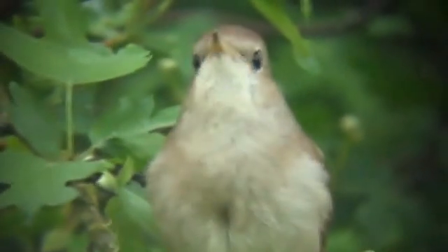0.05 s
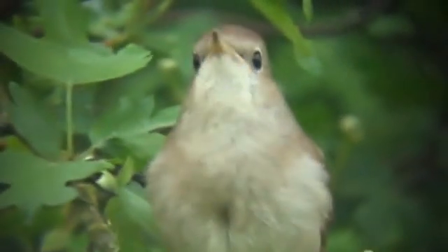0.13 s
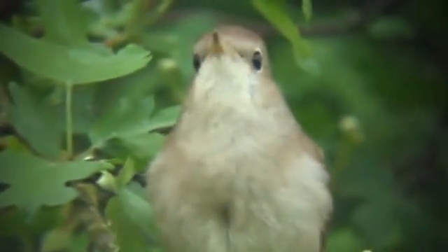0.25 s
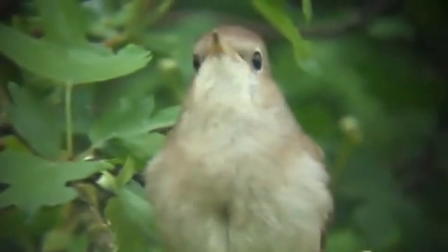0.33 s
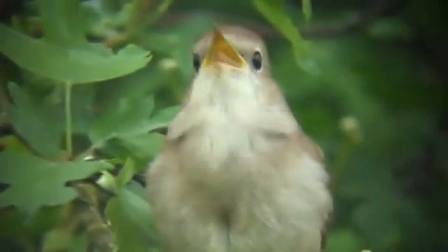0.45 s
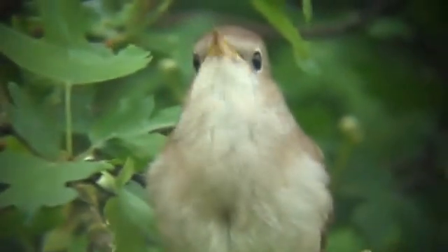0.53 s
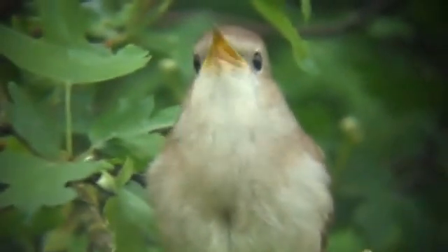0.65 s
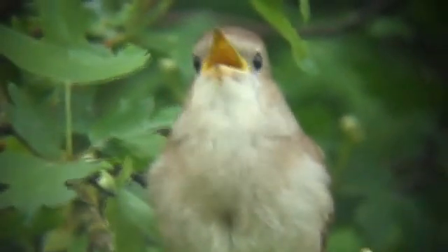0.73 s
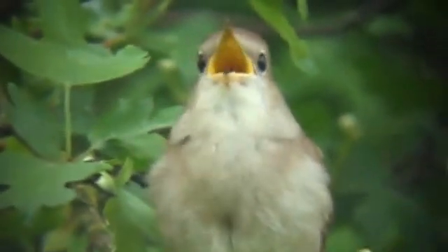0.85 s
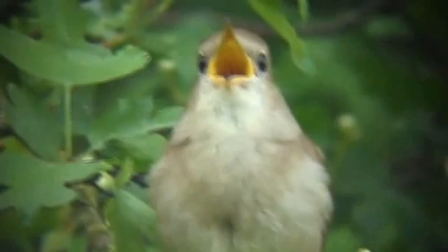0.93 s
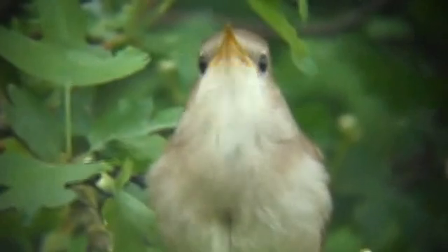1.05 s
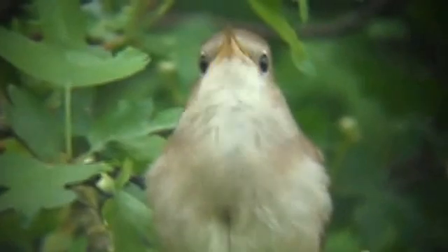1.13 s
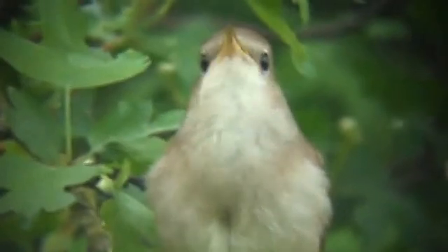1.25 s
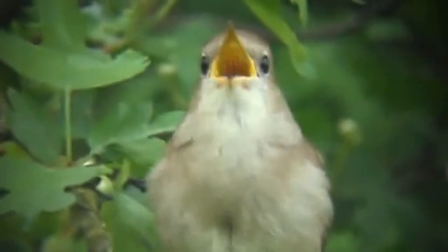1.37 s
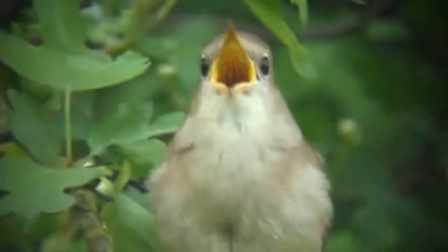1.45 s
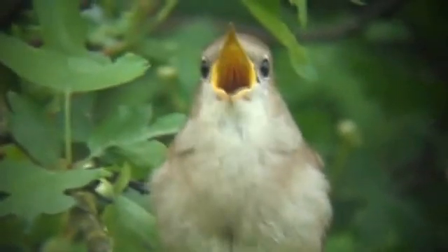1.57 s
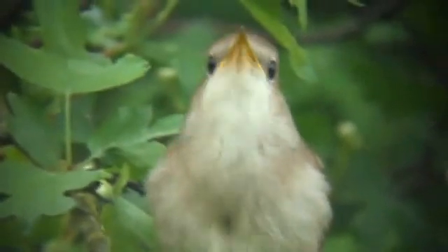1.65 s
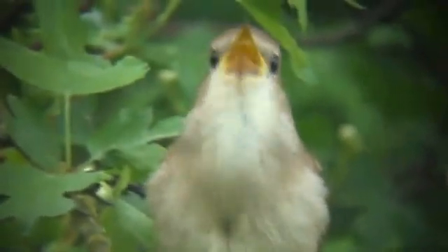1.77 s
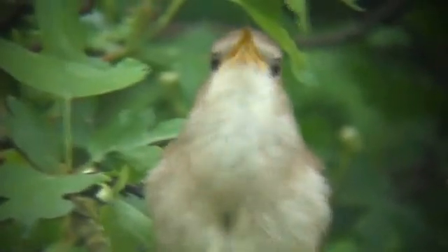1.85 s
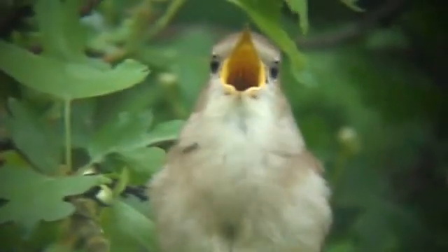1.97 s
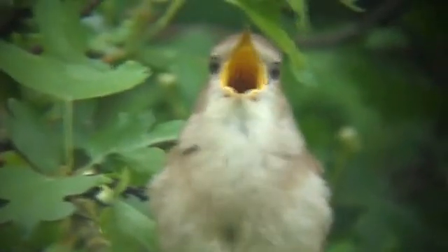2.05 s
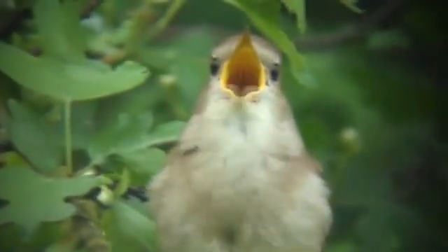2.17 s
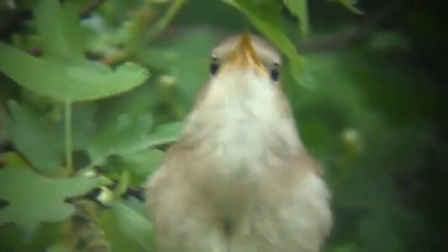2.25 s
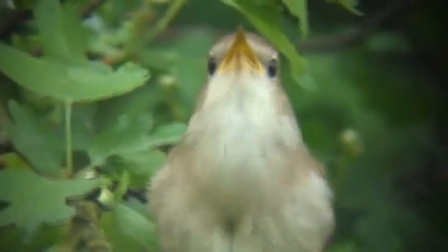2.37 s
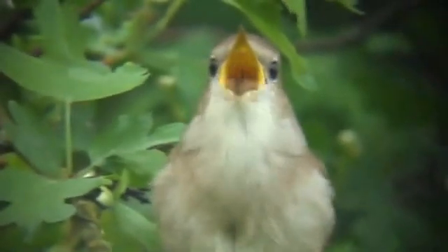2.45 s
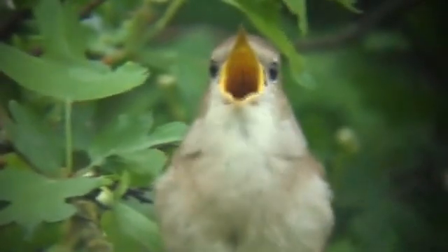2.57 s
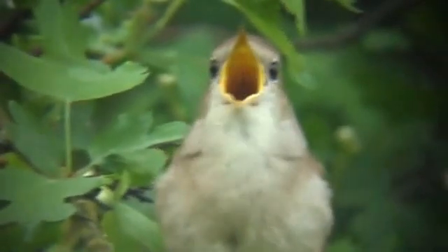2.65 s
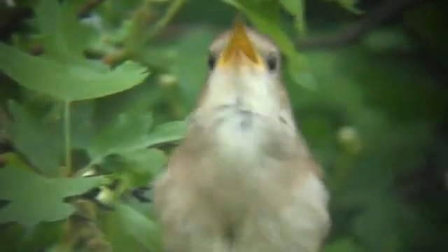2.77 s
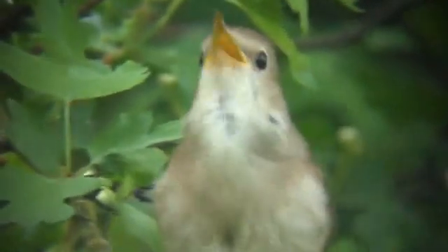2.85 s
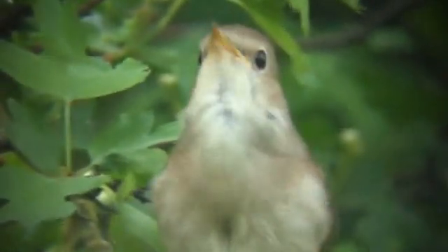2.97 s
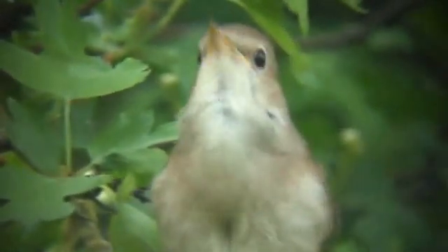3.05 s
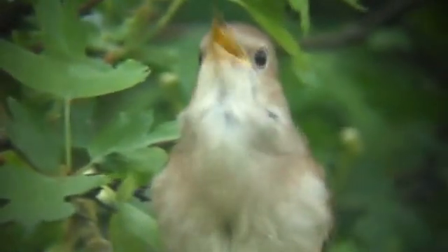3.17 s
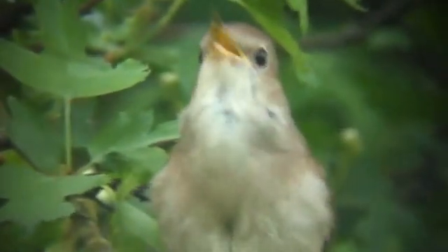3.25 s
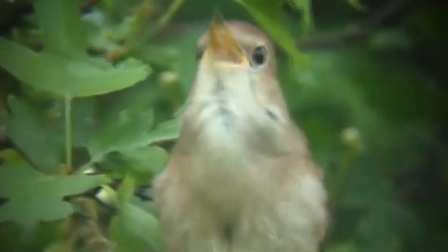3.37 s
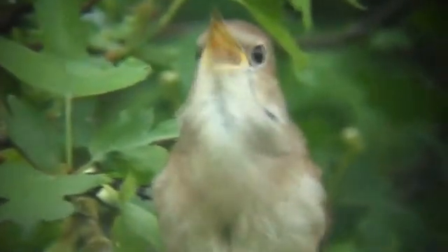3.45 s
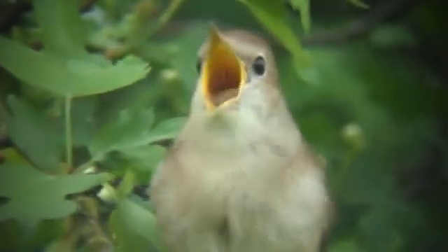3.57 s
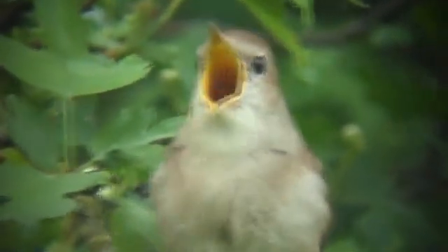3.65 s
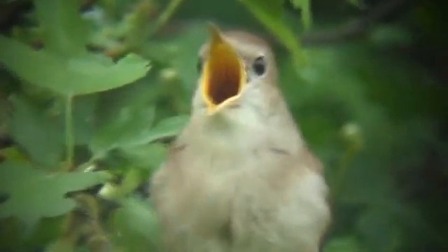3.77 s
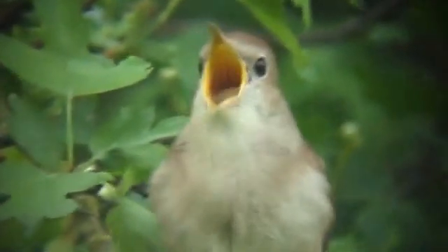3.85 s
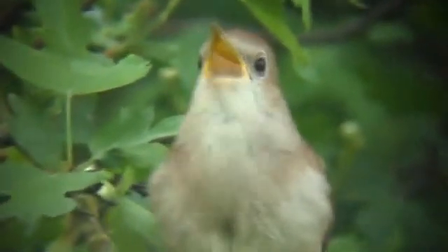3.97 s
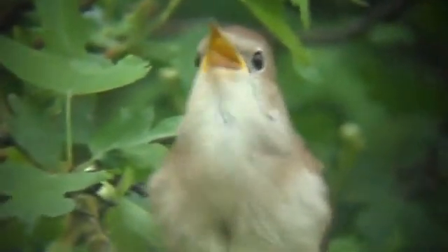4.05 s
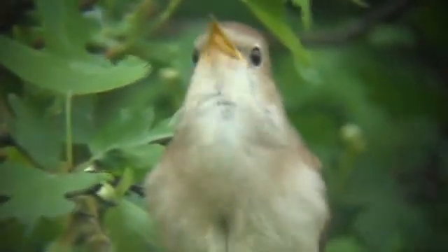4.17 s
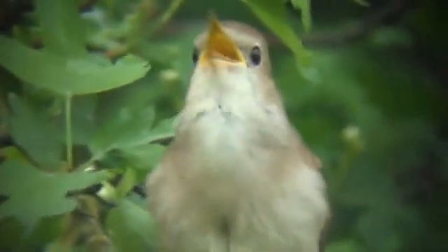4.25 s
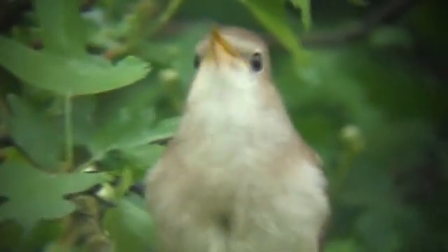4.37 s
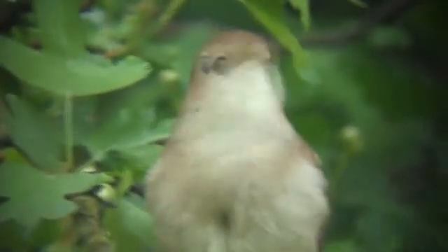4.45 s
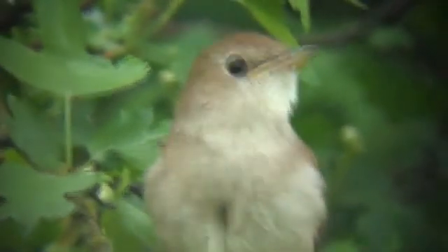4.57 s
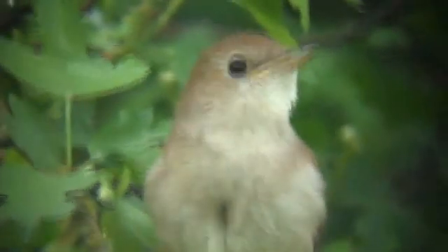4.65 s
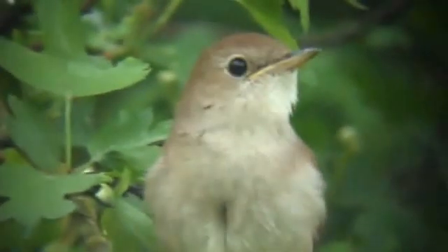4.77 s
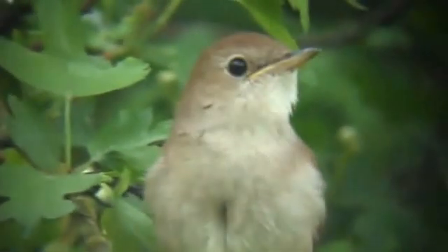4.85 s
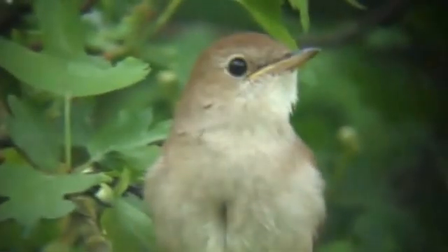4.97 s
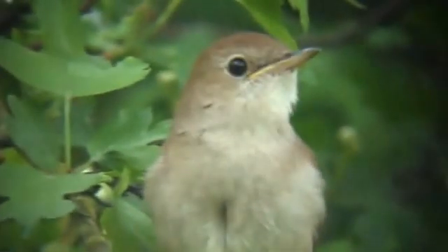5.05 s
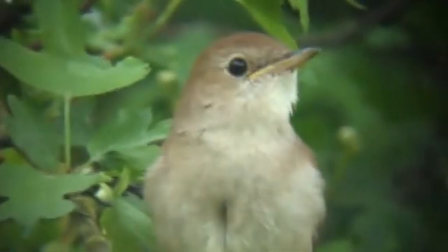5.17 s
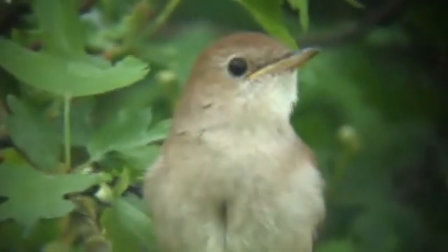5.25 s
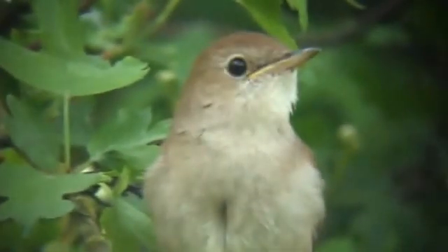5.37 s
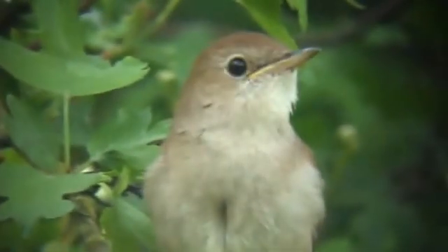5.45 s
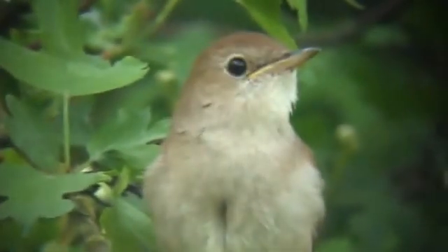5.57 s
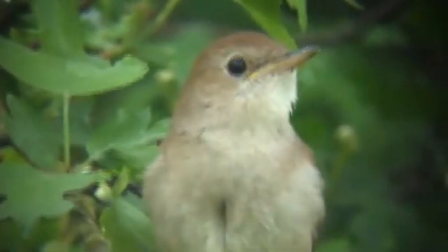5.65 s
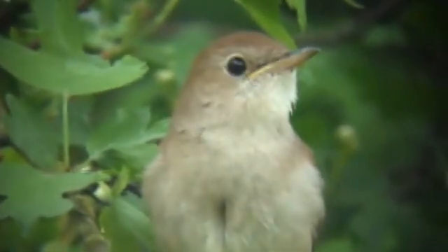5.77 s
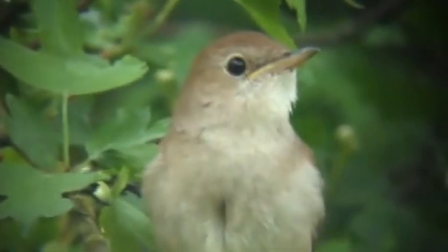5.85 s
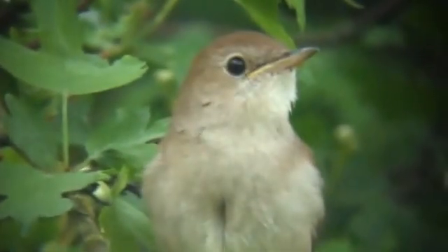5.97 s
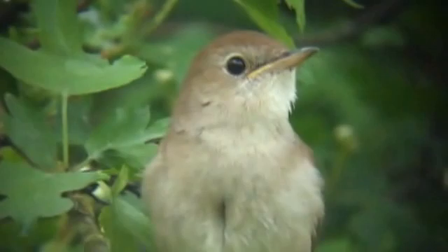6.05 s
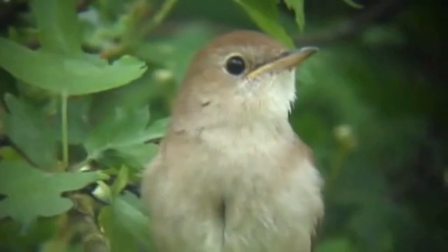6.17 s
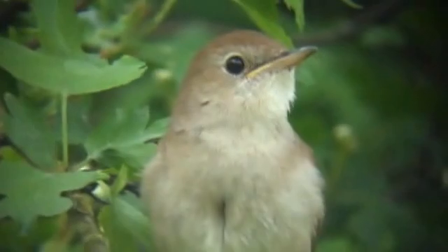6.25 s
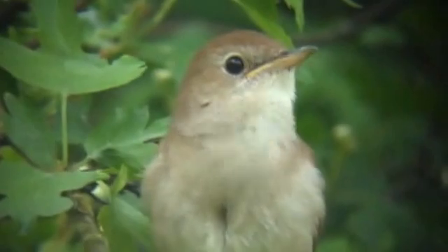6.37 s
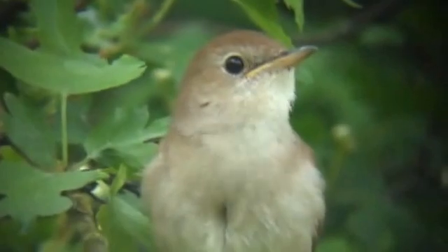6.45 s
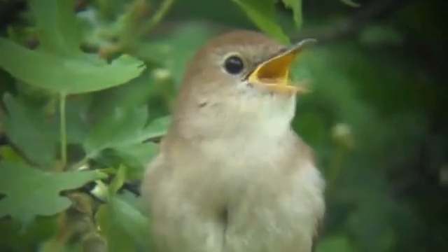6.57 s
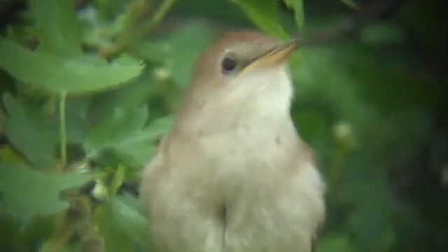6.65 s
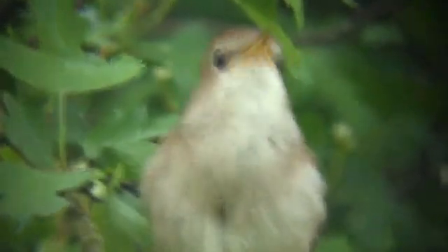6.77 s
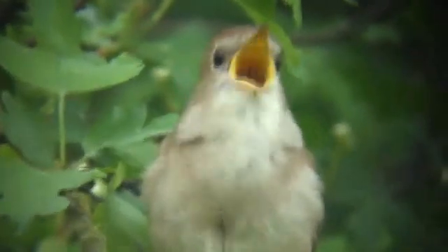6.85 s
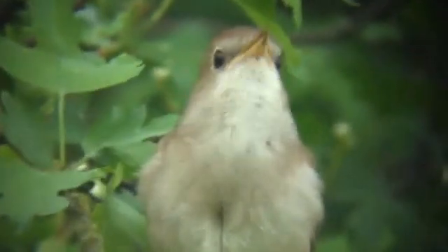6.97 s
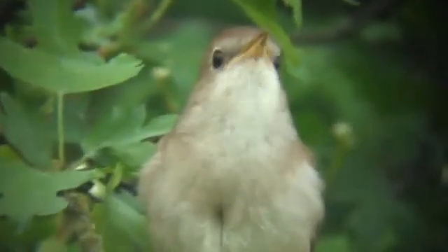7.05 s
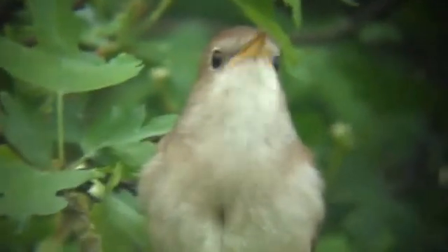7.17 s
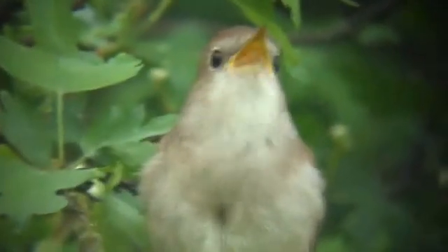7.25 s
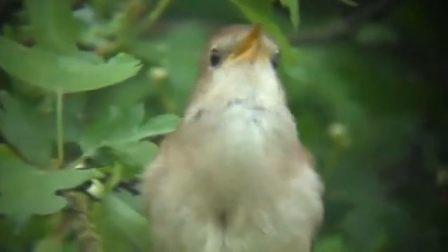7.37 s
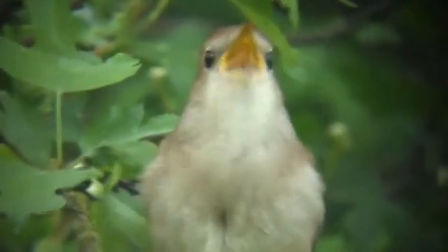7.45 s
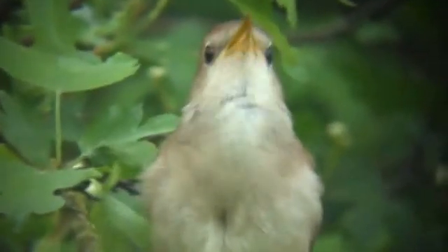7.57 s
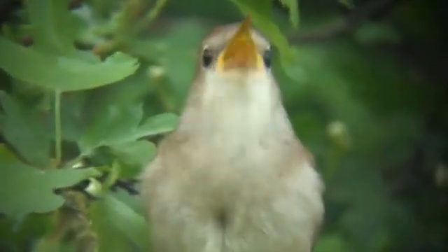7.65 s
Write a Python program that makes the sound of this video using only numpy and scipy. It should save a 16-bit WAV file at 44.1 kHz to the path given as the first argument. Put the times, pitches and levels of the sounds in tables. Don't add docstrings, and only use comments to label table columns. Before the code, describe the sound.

A nightingale sings close by in a hedge: swelling whistles, harsh buzzes, a low bubbling run, sharp sweeps and chups, with distant birds chirping.

```python
import sys
import numpy as np
from scipy import signal
from scipy.fft import rfft, irfft, next_fast_len
from scipy.io import wavfile
from scipy.ndimage import uniform_filter1d, map_coordinates

SR = 44100
rng = np.random.default_rng(int(sys.argv[2]) if len(sys.argv) > 2 else 0)


def master(y):
    cut = np.clip(np.atleast_2d(y).T, -1, 1)
    pcm = np.round(cut * 32767)
    wavfile.write(sys.argv[1], SR, pcm.astype(np.int16))


def invert_db(x):
    u = np.asarray(x, float) / 20
    return 10 ** u


N = 340452


def unit(x):
    return x / np.sqrt(np.mean(x ** 2) + 1e-20)


def along(points, hz):
    f, v = np.transpose(points)
    return np.interp(np.log(hz + 1), np.log(f + 1), v)


def wobble(knots_per_s, count=N):
    knots = rng.standard_normal(int(count * knots_per_s / SR) + 4)
    return map_coordinates(knots, [np.arange(count) * knots_per_s / SR])


def filtered(x, response):
    m = next_fast_len(N + SR // 2)
    return irfft(rfft(x, m) * response(np.fft.rfftfreq(m, 1 / SR)), m)[..., :N]


# freq_hz, correlation
AIR_LIKENESS = [(50, .83), (250, .62), (800, .8), (2000, .75), (10000, .9)]


def rush(spectrum, patchy_db, span_frames):
    z = signal.stft(rng.standard_normal((2, N + 512)), nperseg=512)[2]
    field = uniform_filter1d(rng.standard_normal(z.shape[1:]), size=5, axis=0)
    field = uniform_filter1d(field, size=span_frames, axis=1)
    pair = signal.istft(z * invert_db(patchy_db * unit(field)), nperseg=512)[1][:, :N]

    def mid_side(hz):
        turn = np.arccos(np.clip(along(AIR_LIKENESS, hz), -1, 1)) / 2
        return invert_db(along(spectrum, hz)) * [np.cos(turn), np.sin(turn)]

    mid, side = filtered(pair, mid_side)
    return unit(np.array([mid + side, mid - side]))


def over_time(rows, column):
    return np.interp(np.arange(N) / SR, [r[0] for r in rows], [r[column] for r in rows])


# time_s, level_db
GUSTS = [(0, -19.5), (.38, -27.5), (.48, -40), (.58, -21.5), (.66, -27.5), (.68, -19), (.71, -23.5),
         (1.3, -31), (1.55, -34), (1.65, -42.5), (2.13, -48.5), (2.2, -35), (2.45, -41.5), (2.95, -47.5),
         (3.1, -33.5), (3.3, -44), (3.55, -40), (3.9, -51.5), (5.85, -51.5), (5.95, -44), (6.1, -49.5)]
# freq_hz, density_db
BUFFET = [(20, -25.5), (65, -7), (130, -2.5), (220, -5), (500, -20.5), (1100, -63.5)]


def wind():
    lumps = invert_db(1.5 * wobble(13) + 3.2 * wobble(50))
    return invert_db(over_time(GUSTS, 1)) * unit(lumps * rush(BUFFET, patchy_db=0.0, span_frames=6))


# time_s, traffic_db, chatter_db
AIR = [(0, -43.5, -41.5), (1.8, -38, -43), (2.9, -42.5, -36.5), (4.2, -40.5, -47), (6.5, -45, -42),
       (7.72, -41.5, -39)]
# freq_hz, density_db
TRAFFIC = [(25, -11.5), (60, -4.5), (160, -7), (723, 0.5), (2430, -17.5), (5900, -25), (8600, -32),
           (12200, -30), (13200, -27.5)]
# freq_hz, density_db
CHATTER = [(2000, -81), (3200, 3), (5500, 4.5), (6800, -7.5), (8500, -12)]


def air():
    traffic = invert_db(over_time(AIR, 1) + [[.7], [2.3]]) * rush(TRAFFIC, patchy_db=1.4, span_frames=14)
    chatter = invert_db(over_time(AIR, 2) - 6.5) * rush(CHATTER, patchy_db=5.0, span_frames=8)
    return filtered(wind() + traffic + chatter, lambda hz: hz < 13350)


# freq_hz, t60_s
LEAF_DECAY = [(1500, 0.31), (4000, 0.29), (12000, 0.34)]
# freq_hz, level_db
ECHO_TONE = [(5000, 0), (12000, -2)]


def leaves(near, far, stretches=30):
    x = filtered(invert_db(-11.5) * near + invert_db(-6.0) * far.mean(0), lambda hz: invert_db(along(ECHO_TONE, hz)))
    out, step, delay = np.zeros((2, N + SR)), N // stretches + 1, 200
    for start in range(0, N, step):
        hz, t, z = signal.stft(rng.standard_normal((2, SR // 2)), SR, nperseg=256)
        decay = invert_db(-60 * t / along(LEAF_DECAY, hz)[:, None])
        tail = signal.istft(z * decay, SR, nperseg=256)[1]
        tail = tail[0] + 0.46 * tail[1] * [[1], [-1]]
        wet = signal.fftconvolve(x[None, start:start + step], tail / np.linalg.norm(tail[0]), axes=1)
        out[:, start + delay:][:, :wet.shape[1]] += wet
    return out[:, :N]


def spread(rows, edge_s=0.0028):
    s, *cols = np.transpose(rows)
    t = np.arange(max(s[0] - edge_s, 0), s[-1] + edge_s, 1 / SR)
    fade = np.clip(np.minimum(t - t[0], t[-1] - t) / edge_s, 0, 1) ** 2
    return round(t[0] * SR), [uniform_filter1d(np.interp(t, s, c), size=130) for c in cols], fade


# freq_hz, level_db
BEAK = [(4000, 4.5), (8800, -14), (10300, 0.5), (12000, 7.5), (13500, 1.5), (15500, 0), (15800, -31)]


def syrinx(out, start, hz, gain, tones=(), rough_db=0, lift_db=0, strain=0):
    count = len(hz)
    turn = 2 * np.pi * (np.cumsum(hz) / SR + rng.random())
    note = invert_db(rough_db * wobble(176, count)) * np.sin(turn)
    effort = (gain / invert_db(-14.5)) ** strain
    for k, db in tones:
        flutter, drift = wobble(500, count), wobble(490, count)
        lift = lift_db * np.log2(hz / hz.max())
        level = invert_db(db + along(BEAK, k * hz) + lift + 0.5 * k * flutter)
        note += level * np.sin(k * (turn + 0.022 * drift)) * (k * hz < SR / 2) * effort
    out[start:start + count] += (gain * note)[:len(out) - start]


# start_s, level_db
PLUNGES = [(0.092, -48), (0.271, -47), (.452, -47), (0.62, -47.5), (.793, -49.5), (7.288, -41)]
# start_s, length_s, pitch_hz, level_db
HELD = [(0.321, 0.092, 3364, -42.5), (0.2, 0.18, 7640, -54.5), (3.218, 0.16, 7510, -53.5),
        (1.42, 0.14, 6820, -47), (1.825, 0.039, 2026, -43), (1.908, 0.07, 1977, -38),
        (2.062, 0.052, 2114, -36), (2.555, 0.072, 2030, -38.5), (2.632, 0.012, 1820, -38),
        (2.681, 0.0087, 1950, -38), (3.445, 0.12, 5810, -45.5), (5.51, 0.032, 8050, -50),
        (5.664, 0.037, 5810, -41), (6.234, 0.29, 2920, -59), (6.255, 0.32, 4650, -58),
        (6.233, .2, 3460, -60.5), (6.558, 0.17, 3630, -53), (6.595, 0.1, 4050, -50.5),
        (7.029, 0.061, 2430, -40.5), (7.118, 0.033, 5300, -42), (7.596, 0.072, 1740, -32.5),
        (7.597, 0.14, 2060, -36), (7.6, 0.11, 7000, -44)]
# start_s, length_s, from_hz, to_hz, level_db
UP = [(0.197, 0.014, 5800, 7600, -48.5), (1.294, 0.041, 3900, 5300, -46.5),
      (3.317, 0.019, 3800, 5030, -40.5), (5.841, 0.039, 3070, 4800, -39), (7.345, 0.026, 3870, 5560, -39),
      (7.4, 0.038, 3870, 5250, -38.5), (7.502, 0.023, 3700, 4350, -34), (7.68, 0.043, 3520, 4520, -43.5)]
# start_s, length_s, from_hz, to_hz, level_db
DOWN = [(.445, 0.039, 5000, 3700, -48), (4.265, 0.027, 5500, 3900, -38), (2.388, 0.076, 2500, 1740, -41),
        (5.546, 0.035, 8100, 7600, -48), (5.788, 0.042, 3960, 3080, -40.5), (5.966, 0.027, 7300, 6800, -46),
        (6.696, .018, 7000, 5600, -47), (6.767, 0.079, 4660, 4260, -38.5),
        (7.109, 0.032, 2370, 2070, -44.5), (7.152, 0.027, 5220, 3730, -34.5),
        (7.299, 0.064, 1890, 1730, -42), (7.417, 0.024, 4290, 3300, -32.5)]
# start_s, length_s, edge_hz, middle_hz, level_db
TURNS = [(1.388, 0.045, 6670, 7550, -51), (2.179, 0.05, 2240, 2510, -37.5), (2.267, .13, 2550, 2310, -39),
         (5.927, 0.034, 7475, 6720, -47.5), (6.642, 0.048, 6860, 6660, -41.5),
         (6.845, 0.035, 6500, 6070, -43.5), (7.242, 0.057, 1970, 1660, -45.5)]
# start_s, length_s,
# from_hz, middle_hz, to_hz, level_db
PASSING = [(0.587, 0.057, 3300, 3570, 3500, -57), (0.78, 0.058, 3200, 3500, 3530, -51),
           (0.883, 0.021, 3600, 3600, 2900, -52), (.745, .016, 3000, 3600, 3130, -41.5),
           (.9, .03, 4700, 5700, 4550, -53), (1.853, 0.024, 3400, 2700, 2300, -43),
           (1.74, 0.015, 6200, 7300, 7700, -48.5), (1.745, 0.12, 8200, 8000, 7570, -54),
           (2.131, 0.01, 1900, 2000, 2400, -38), (2.158, .01, 2100, 1600, 2250, -44),
           (2.655, 0.011, 1950, 1900, 1900, -40), (3.059, 0.033, 6400, 4700, 3950, -44),
           (3.403, .055, 4900, 4750, 3930, -46), (3.675, 0.04, 4300, 4500, 4200, -41),
           (3.695, 0.025, 3700, 3600, 3500, -43), (4.189, .012, 10200, 8700, 8550, -29),
           (4.291, 0.021, 4000, 3800, 4930, -34.5), (4.292, 0.026, 2600, 3400, 3810, -38),
           (4.425, 0.024, 6400, 3700, 3770, -34.5), (3.774, 0.057, 8100, 7300, 7750, -49.5),
           (6.807, 0.067, 2800, 2950, 3050, -52), (6.83, .062, 5100, 5200, 4900, -52),
           (6.874, .005, 6400, 4300, 2500, -38), (6.916, 0.051, 3150, 3050, 2800, -53),
           (6.868, .018, 3900, 4050, 4200, -47)]


def far_notes():
    sag, bow = 0.01, 0.074
    notes = [(s, .061, 7480, 5850, 4270, db) for s, db in PLUNGES]
    notes += [(s, life, hz * (1 - sag), hz, hz * (1 - sag), db) for s, life, hz, db in HELD]
    notes += [(s, life, a, (a + c) / 2 + bow * abs(c - a), c, db) for s, life, a, c, db in UP + DOWN]
    notes += [(s, life, edge, middle, edge, db) for s, life, edge, middle, db in TURNS]
    return notes + PASSING


# start_s, length_s, from_hz, middle_hz, to_hz, level_db
ARCHES = [(0.064, .04, 8100, 7500, 7000, -49), (.11, .04, 4100, 4000, 3750, -44.5),
          (.175, .025, 7600, 7300, 7200, -54), (0.193, .055, 3700, 3400, 3620, -55),
          (.348, .018, 7400, 7500, 6300, -49), (.375, .01, 5800, 7300, 7000, -52),
          (.425, .03, 4500, 4750, 4770, -48), (3.42, .02, 3700, 3800, 3900, -43),
          (3.497, .045, 4200, 5500, 5070, -45), (3.576, .033, 2900, 4350, 4540, -36.5),
          (3.671, .032, 5000, 5300, 5260, -42.5), (3.678, .02, 5900, 6300, 6600, -47),
          (3.752, .02, 4300, 4700, 4400, -45), (6.915, .155, 7700, 8700, 7500, -54),
          (7.18, .05, 4000, 5300, 7100, -52), (7.23, .06, 7200, 7450, 7400, -56),
          (7.545, .03, 5200, 5900, 6100, -50), (4.507, .09, 6700, 6300, 4150, -42.5)]
# start_s, level_db
TRILL = [(1.631, -42.5), (1.879, -44), (2.135, -45), (2.57, -47.5), (2.65, -55), (3.146, -46)]
# start_s, level_db
SEESAW = [(.52, -45.5), (.715, -45), (0.906, -45.5), (1.095, -43)]


def neighbour_notes():
    trill = TRILL + [(4.644 + .0874 * k, -35 - .5 * k) for k in range(10)]
    notes = ARCHES + [(s, .034, 5800, 4850, 4000, db) for s, db in trill]
    for s, db in SEESAW:
        notes += [(s, .044, 5540, 5920, 6200, db), (s + .082, .058, 6600, 5500, 4000, db)]
    return notes + [(s, .005, 6500, 5400, 4200, -47) for s in np.arange(6.008, 6.64, .0284)]


def crowd_notes():
    notes = []
    for when, life, pitch, glide, size in rng.random((150, 5)):
        hz, bend = 2900 + 3800 * pitch, glide ** 2
        length_s = .02 + .05 * life ** 3
        notes += [(when * N / SR, length_s, hz * (1 + .2 * bend), hz, hz * (1 - .15 * bend), -65 + 6 * size)]
    return notes


# time_s, pitch_hz, level_db, flutter_per_s, swing_hz
WARBLES = [
    [(.005, 4080, -39.5, 225, 550), (.07, 3790, -33, 230, 517), (.12, 2727, -37.5, 330, 448),
     (.185, 2180, -44.5, 290, 300)],
    [(.24, 2290, -46, 183, 250), (.27, 3410, -32, 130, 583), (.295, 4160, -42, 99, 790),
     (.335, 3020, -45, 69, 495), (.41, 2300, -50, 70, 350)],
    [(7.41, 2410, -41, 58, 300), (7.48, 2245, -39, 64, 393), (7.555, 2040, -47, 65, 300)],
]


def warbles(out):
    for rows in WARBLES:
        start, (hz, db, rate, swing), fade = spread(rows)
        beat = 2 * np.pi * np.cumsum(rate) / SR
        gain = invert_db(db) * fade * (1 + 0.33 * np.sin(beat))
        syrinx(out, start, hz + swing * np.cos(beat), gain, rough_db=1.8)


def chorus():
    high_low = np.zeros((2, N))
    for s, length, a, b, c, db in far_notes() + neighbour_notes() + crowd_notes():
        u = np.linspace(-1, 1, int(length * SR))
        hz = b + (c - a) / 2 * u + ((a + c) / 2 - b) * u * u
        hz = hz * (1 + .008 * wobble(30, len(u)))
        ends = np.sin(np.pi / 2 * np.minimum(1, 15.0 * (1 - abs(u))))
        syrinx(high_low[int(b < 4300)], round(s * SR), hz, invert_db(db + 0.5) * ends, rough_db=2.8)
    warbles(high_low[1])
    return invert_db([[5.0, 3.5], [2.0, 3.4]]) @ high_low


def sung(shape, rows):
    return [[(s + np.prod(pace) * dt, hz * factor, db + change) for dt, hz, db in shape]
            for s, change, factor, *pace in rows]


def voiced(notes, tones, hiss_db, lift_db=0, strain=0):
    tone, breath = np.zeros((2, N))
    for rows in notes:
        start, (hz, db), fade = spread(rows)
        syrinx(tone, start, hz, invert_db(db) * fade, tones, rough_db=0.93, lift_db=lift_db, strain=strain)
        breath[start:start + len(hz)] += invert_db(db + hiss_db) * fade
    return np.array([tone, breath])


# start_s, level_db
CLICKS = [
    (4.6203, -16.5),
    (7.531, -19.5),
]
# centre_hz, width_hz, level_db
THROAT = [(4570, 940, 5.5), (5700, 1100, -7), (12400, 1100, 0.5)]


def clicks():
    rasp, t = np.zeros(N), np.arange(int(.03 * SR)) / SR
    for s, db in CLICKS:
        rasp[round(s * SR):][:len(t)] = invert_db(db + 7 - 1000 * t) * rng.standard_normal(len(t))

    def throat(f):
        modes = sum(invert_db(db) * 1j * f * w / (c * c - f * f + 1j * f * w) for c, w, db in THROAT)
        return invert_db(-(f / 12700) ** 20) * modes

    return filtered(rasp, throat)


# time_s, pitch_hz, level_db
CROAK = [
    [(7.397, 2573, -40), (7.408, 2826, -40), (7.42, 2870, -33.5), (7.432, 2180, -50)],
]
# multiple, level_db
CROAK_TONES = [(1.5, 4), (2, 6), (3.5, -7), (4, -13), (4.5, -12)]


def croak():
    return voiced(CROAK, CROAK_TONES, hiss_db=-30)


# offset_s, pitch_hz, level_db
PICKUP = [(0, 1620, -29.5), (.013, 2070, -20.5), (.02, 2500, -31)]
# start_s, change_db, pitch_factor
PICKUPS = [(4.288, -1, 1.01), (4.399, 5.5, 1.036), (4.501, 4.5, .99)]
# offset_s, pitch_hz, level_db
CHUP = [(0, 3800, -12), (.006, 3040, -8), (.015, 2560, -11), (.025, 2460, -17.5), (.034, 2580, -39)]
# start_s, change_db, pitch_factor, length_factor
CHUPS = [(4.316, 0.4, 0.99, 1.35), (4.425, 0, 1.003, 1), (4.528, 0.1, .98, 0.87)]
# time_s, pitch_hz, level_db
OPENING = [
    [(6.995, 2920, -30), (6.999, 4260, -19.5), (7.004, 4490, -15), (7.015, 3370, -12), (7.028, 2950, -18.5)],
    [(6.65, 2780, -33), (6.657, 2449, -41)],
    [(6.652, 1950, -41), (6.664, 1486, -47)],
]
# multiple, level_db
CHUP_TONES = [(2, -20), (3, -20.5), (4, -30)]


def chups():
    notes = sung(PICKUP, PICKUPS) + sung(CHUP, CHUPS) + OPENING
    return voiced(notes, CHUP_TONES, hiss_db=-35, lift_db=28)


# offset_s, pitch_hz, level_db
CHUCK = [
    [(0, 1745, -37), (.02, 2010, -28), (.029, 2430, -28), (.034, 2850, -10.5), (.04, 3490, -23)],
    [(-.003, 2200, -42), (.007, 2480, -29.5), (.017, 2860, -27)],
]
# start_s, change_db, pitch_factor
CHUCKS = [(0.738, -6.5, 1.04), (1.457, -2, 1.025), (2.032, 1.5, .97), (2.583, 2.5, 0.98)]
CHUCK_TOPS = [3070, 3220, 2780, 3500]


def chucks():
    low = [[(s, min(hz, top), db) for s, hz, db in rows]
           for rows, top in zip(sung(CHUCK[0], CHUCKS), CHUCK_TOPS)]
    return voiced(low + sung(CHUCK[1], CHUCKS), [(2, -20.5)], hiss_db=-32)


# offset_s, pitch_hz, level_db
FLICK = [(0, 3316, -29), (.004, 4640, -7), (.009, 5300, -12), (.014, 6030, -22)]
RISE = [(-.002, 3290, -36.5), (.006, 4260, -7), (.013, 4850, -9), (.019, 5050, -15)]
FALL = [(0, 8480, -26.5), (.008, 7030, -16.5), (.016, 6430, -10.5), (.023, 6300, -15), (.028, 5470, -24)]
# start_s, change_db, pitch_factor, length_factor
FLICKS = [(3.836, -2, 0.87, 0.75), (3.939, -0.5, 1.01, 1), (4.05, -0.5, 1.01, 1.2), (4.16, -1, 0.99, .75)]
RISES = [(3.843, -.5, 1.045, 1.07), (3.945, .5, .98, 0.99), (4.058, 0, .95, .87), (4.167, 0, 1.017, 1.02)]
FALLS = [(3.869, 1, 0.97, 0.85), (3.97, 0, 1.003, 1), (4.081, 0, 1.02, 1), (4.196, -1.6, 1.03, .8)]
# multiple, level_db
FLICK_TONES = [(2, -17), (3, -20)]
RISE_TONES = [(2, -13.5), (3, -18)]
FALL_TONES = [(2.03, -12.5)]


def sweeps():
    song = voiced(sung(FLICK, FLICKS), FLICK_TONES, hiss_db=-22)
    song += voiced(sung(RISE, RISES), RISE_TONES, hiss_db=-22)
    return song + voiced(sung(FALL, FALLS), FALL_TONES, hiss_db=-24)


# offset_s, pitch_hz, level_db
JUG = [(0, 2008, -26.5), (.004, 1792, -18), (.012, 1958, -17), (.017, 2367, -15), (.022, 2450, -15),
       (.028, 1952, -18.5), (.034, 1370, -26)]
# start_s, change_db, pitch_factor, length_factor where it differs
JUGS = [(3.072, 1.9, 0.99, 1.1), (3.15, 4, 1.053), (3.234, 2.5, 0.99), (3.317, 1.7, 1.01), (3.405, 2, 0.99),
        (3.488, 2.1, 1.01), (3.574, 1.5, 0.97), (3.657, 2.5, 1.01), (3.739, 3.1, 1.04)]
# multiple, level_db
LOW_TONES = [(2, -42), (5, -25.5), (6, -27), (7, -25)]


def jugs():
    return voiced(sung(JUG, JUGS), LOW_TONES, hiss_db=-26, lift_db=8)


# time_s, pitch_hz, level_db, puffs_per_s
BUZZES = [
    [(2.1875, 3650, -26, 161.3), (2.215, 3770, -16, 164), (2.33, 3694, -14, 149.3), (2.4, 3755, -11, 145.2),
     (2.466, 3782, -8, 157), (2.479, 3740, -24, 156)],
    [(2.7415, 3580, -27, 162), (2.754, 3675, -17, 161.7), (2.79, 3673, -10, 163), (2.82, 3800, -13, 159.3),
     (2.88, 3693, -9, 149.6), (2.972, 3816, -10.5, 150), (2.982, 3620, -24, 148)],
]
BUZZ_FUSE = [.6, .1]
# multiple, level_db
BUZZ_TONES = [(1.3, -22)]


def buzzes():
    tone, breath = np.zeros((2, N))
    open_s, fuse_s, shut_db, shut_hz, open_hz = .06, .035, -15, 11200, 11710
    for rows, fuse in zip(BUZZES, BUZZ_FUSE):
        start, (hz, db, rate), fade = spread(rows)
        t = np.arange(len(hz)) / SR
        cycle = np.cumsum(rate + 5 * wobble(150, len(hz))) / SR
        beat = cycle % 1
        size_db, step_hz, slim = rng.standard_normal((60, 3))[cycle.astype(int)].T * [[.5], [22], [.2]]
        hz, db = hz + step_hz, db + size_db
        shut = np.exp(-t / open_s)
        fused = fuse * np.exp(-t[::-1] / fuse_s)
        sharpness = 1.3 * np.exp(slim + shut ** 3)
        puff = 1.25 * (fused + (1 - fused) * np.sin(np.pi * beat ** 1.1) ** sharpness)
        falling_hz = hz + 560 * (.55 - beat)
        syrinx(tone, start, falling_hz, invert_db(db) * fade * puff, [(2, -28)], rough_db=.5)
        ring_hz = open_hz + (shut_hz - open_hz) * shut + 1700 * (.45 - beat)
        ring = invert_db(db - 18 + shut_db * shut) * fade * puff ** 3 * (1.5 - beat)
        syrinx(tone, start, ring_hz, ring, BUZZ_TONES, rough_db=2.0)
        breath[start:start + len(hz)] += invert_db(db - 34 + shut_db * shut) * fade
    return np.array([tone, breath])


# time_s, pitch_hz, level_db
WHISTLES = [
    [(0.94, 3740, -35.5), (0.98, 3846, -30.5), (1.06, 3724, -25), (1.11, 3700, -24.5), (1.16, 3736, -18),
     (1.22, 3885, -18.5), (1.28, 3848, -18), (1.305, 3670, -22.5), (1.32, 3300, -41)],
    [(1.64, 3480, -30), (1.67, 3724, -19), (1.79, 3800, -13.5), (1.82, 3922, -15), (1.87, 3852, -14),
     (1.895, 3730, -19.5)],
    [(7.1, 3160, -28.5), (7.125, 3204, -17), (7.145, 3324, -12), (7.17, 3200, -9), (7.185, 3166, -15.5)],
]
# multiple, level_db
LONG_TONES = [(2, -27), (3, -27.5), (4, -35.5)]


def whistles():
    return voiced(WHISTLES, LONG_TONES, hiss_db=-48, lift_db=40, strain=.8)


def singer():
    tone, breath = whistles() + buzzes() + jugs() + sweeps() + chucks() + chups() + croak()
    hiss = filtered(rng.standard_normal(N), lambda hz: invert_db(along(BEAK, hz)) * (hz > 3600))
    return tone + breath * unit(hiss) + clicks()


def scene():
    near, far = singer(), chorus()
    return near + far + leaves(near, far) + air()


def top_cut(x):
    return signal.sosfilt(signal.butter(12, 15710, fs=SR, output="sos"), x)


# freq_hz, level_db, lead_rad
PORTS = [(280, 0, .08), (500, -1.8, .36), (3900, -1.7, .33), (4300, 0, .03)]
# freq_hz, level_db
PORT_WIDTH = [(4200, 0), (6000, 3), (9000, 9), (13000, -1)]


def record(dry):
    hz, db, lead = np.transpose(PORTS)

    def halves(f):
        ratio = invert_db(along(np.c_[hz, db], f)) * np.exp(1j * along(np.c_[hz, lead], f))
        return ratio ** np.array([[.5], [-.5]])

    left, right = filtered(dry, halves)
    mid = (left + right) / 2
    side = filtered(left - right, lambda f: invert_db(along(PORT_WIDTH, f))) / 2
    return top_cut(mid + side * [[1], [-1]])


dry = scene()
out = record(dry)
master(out)
```